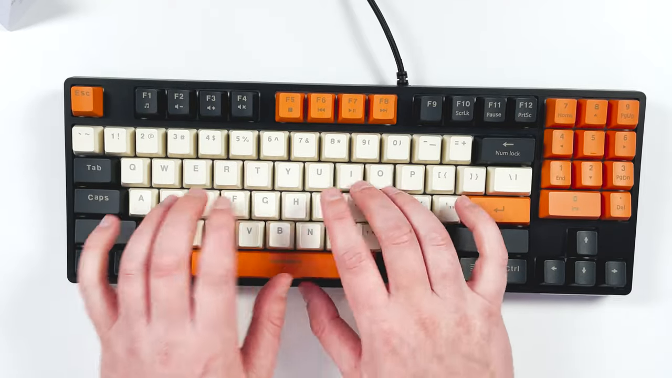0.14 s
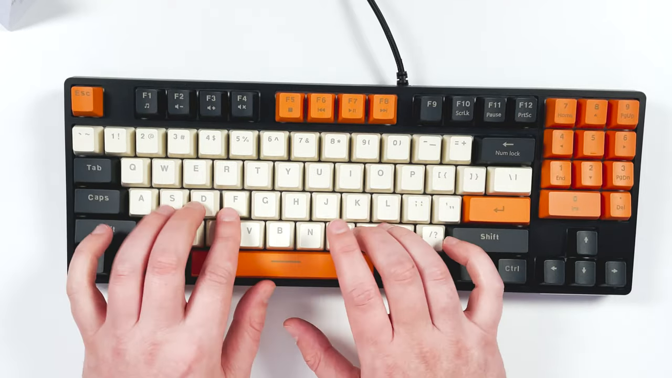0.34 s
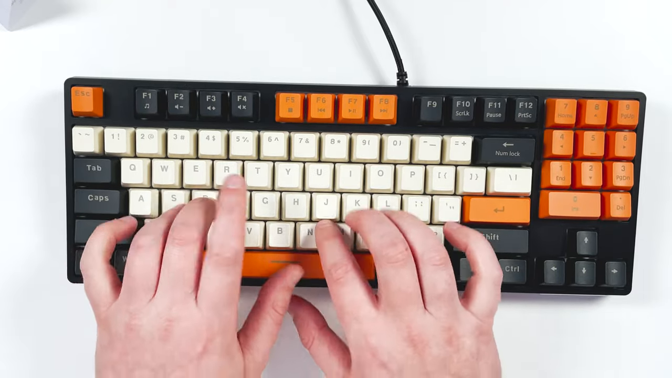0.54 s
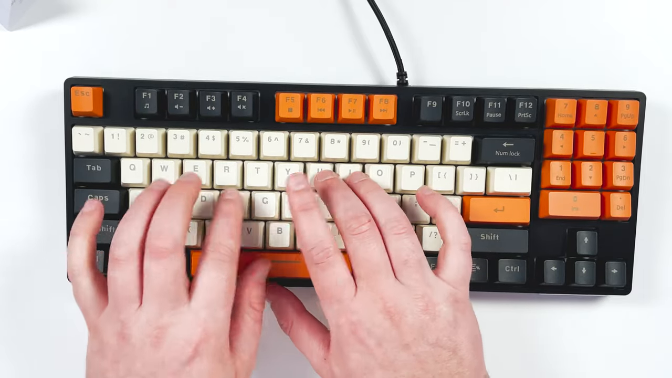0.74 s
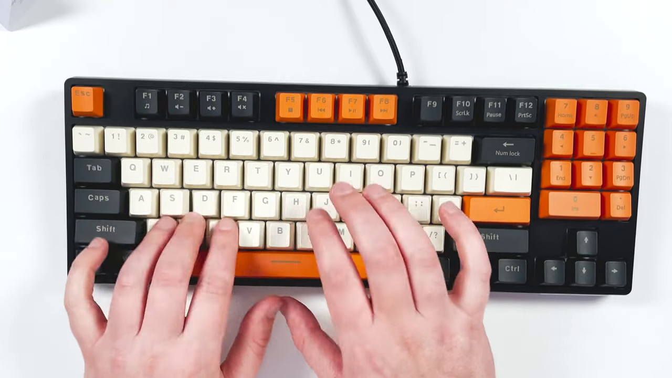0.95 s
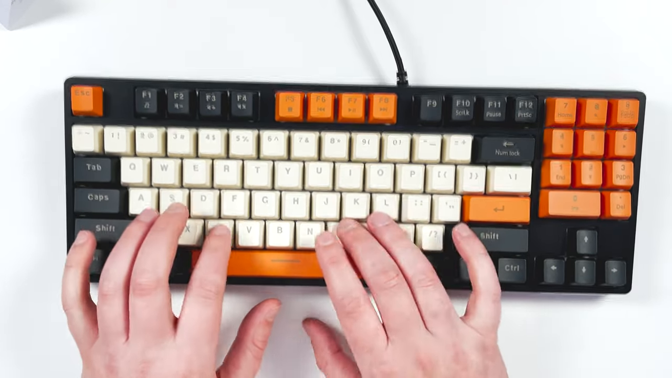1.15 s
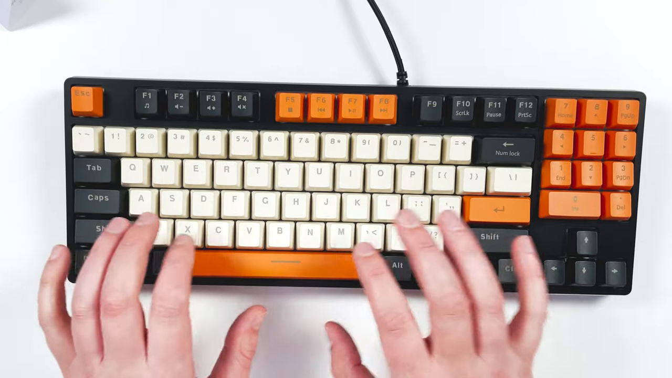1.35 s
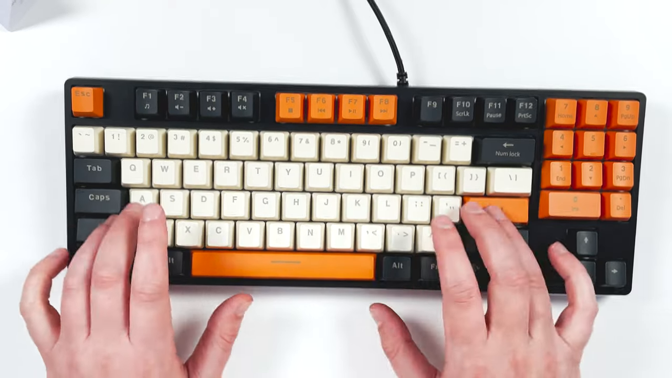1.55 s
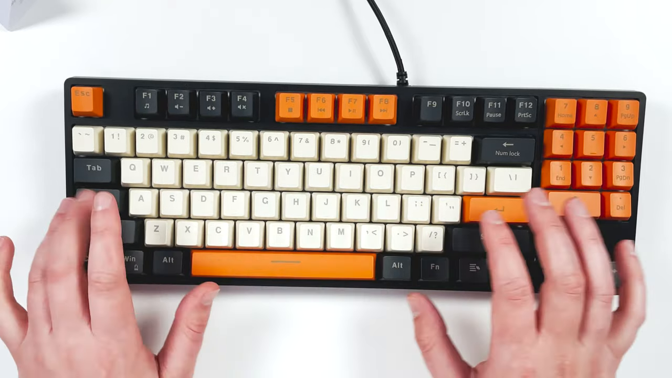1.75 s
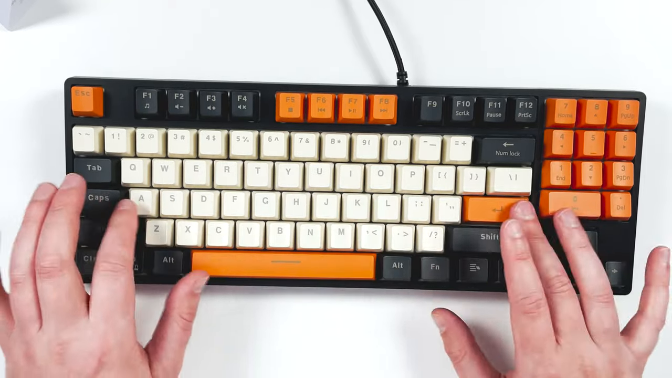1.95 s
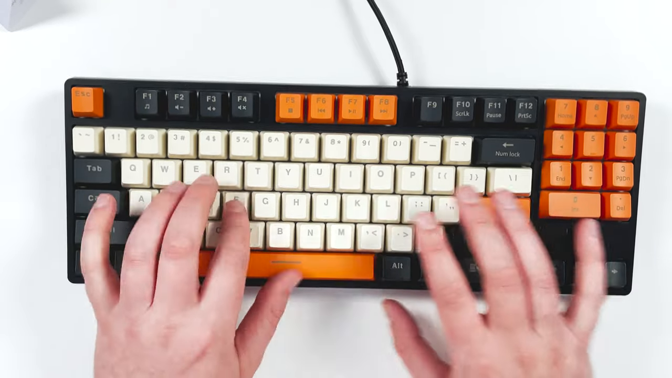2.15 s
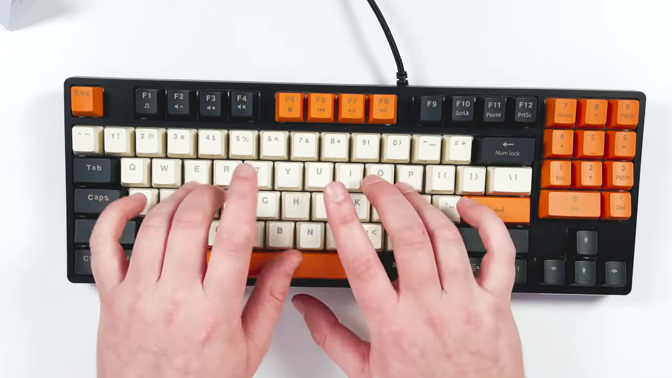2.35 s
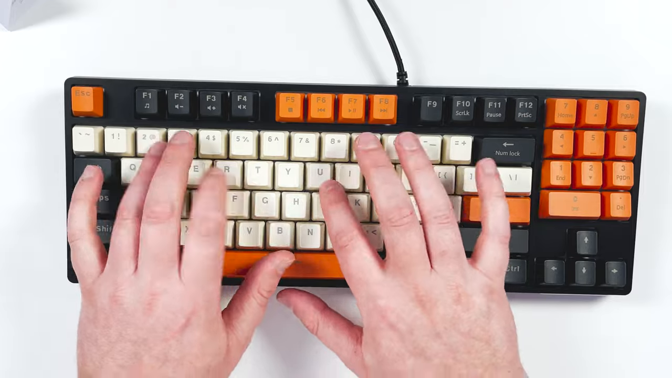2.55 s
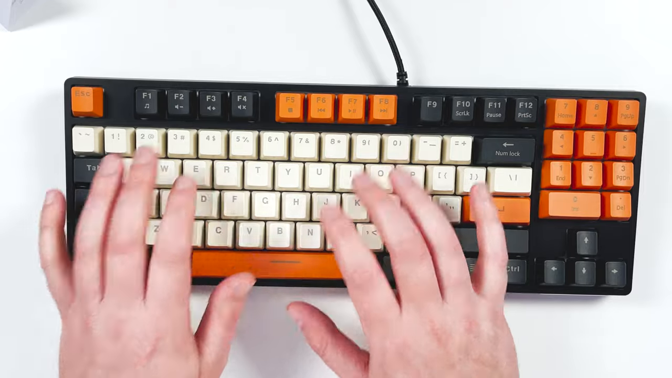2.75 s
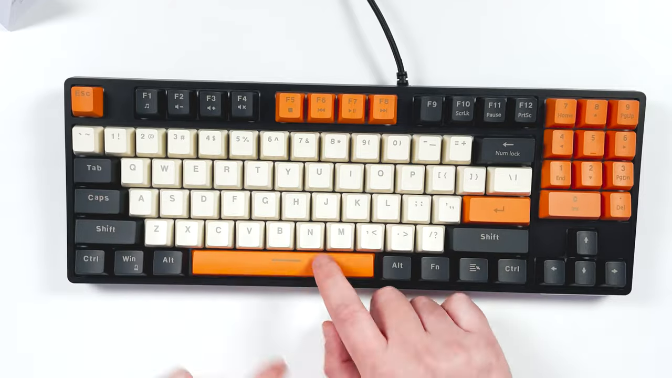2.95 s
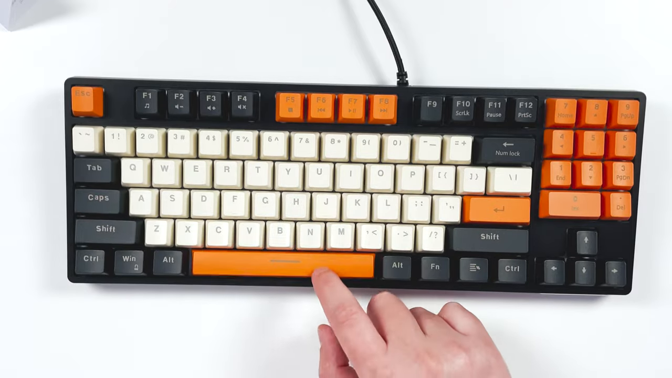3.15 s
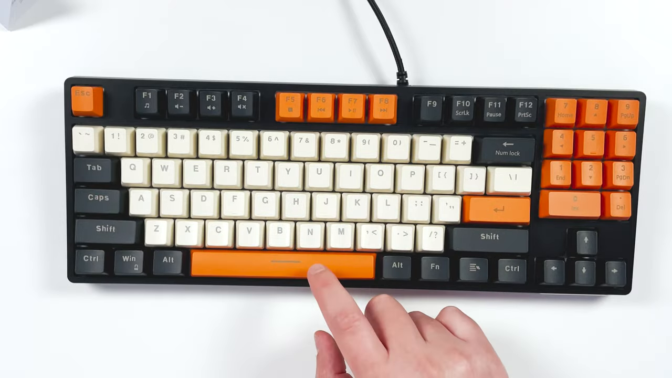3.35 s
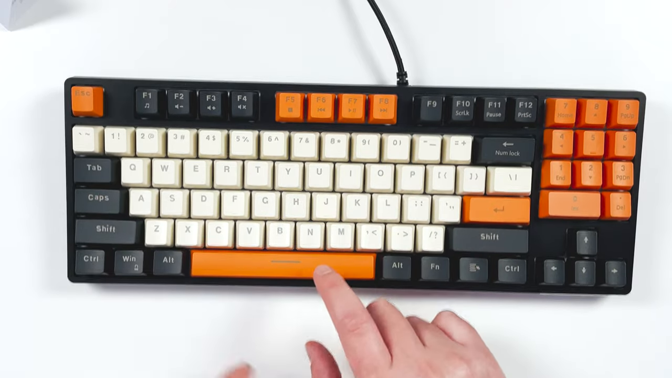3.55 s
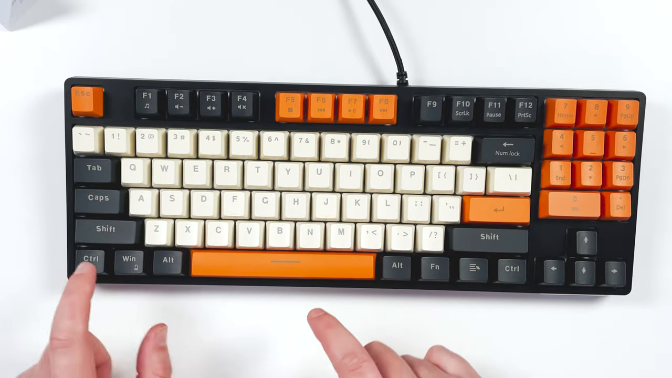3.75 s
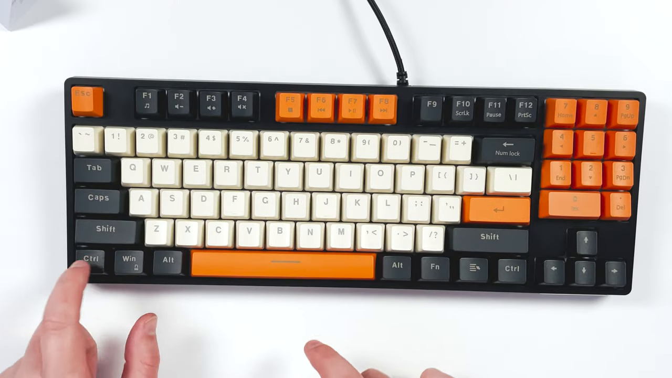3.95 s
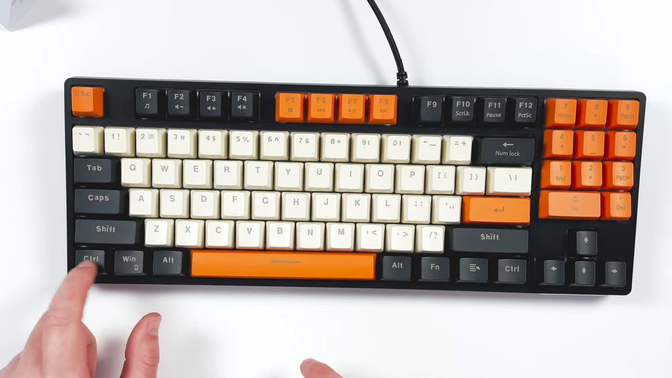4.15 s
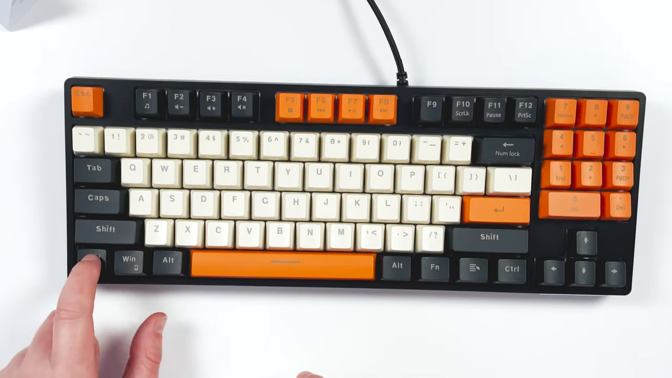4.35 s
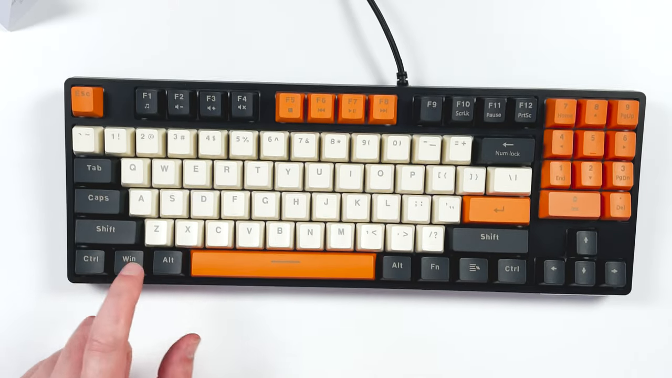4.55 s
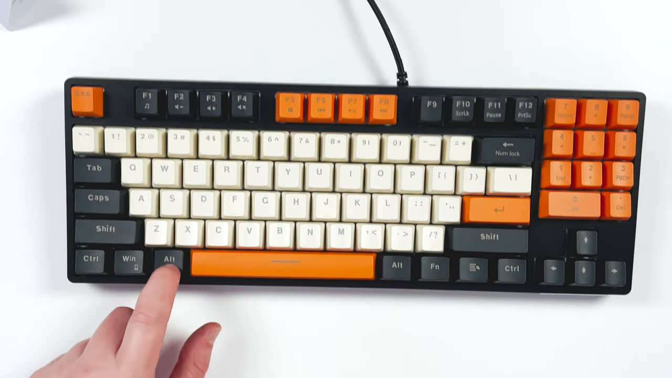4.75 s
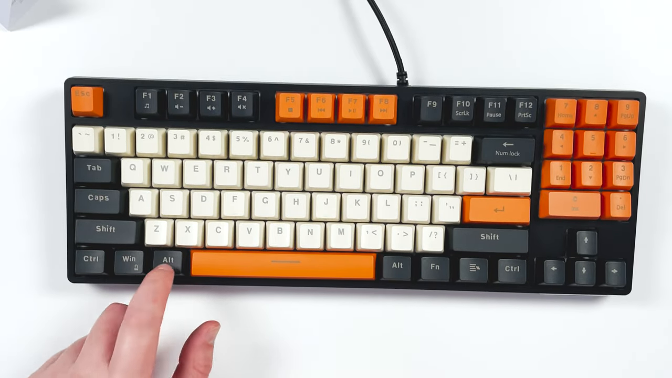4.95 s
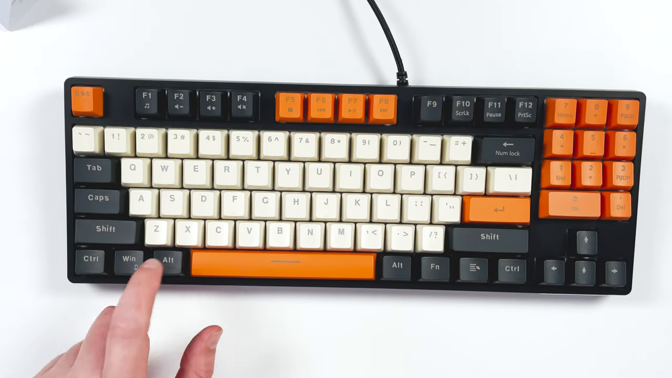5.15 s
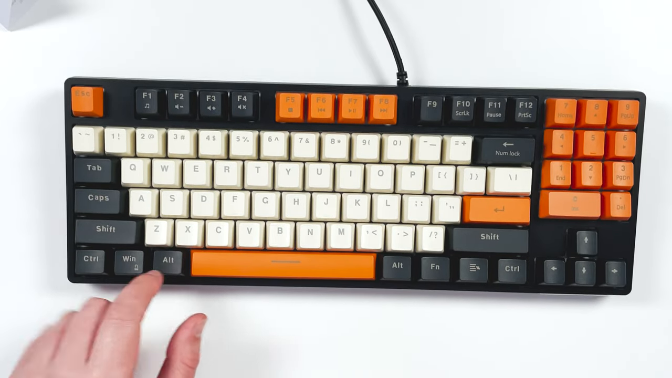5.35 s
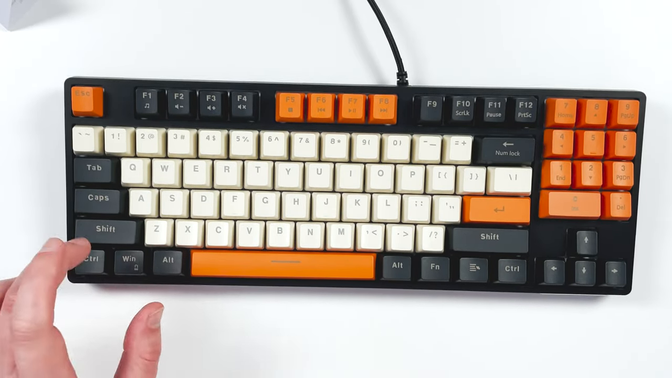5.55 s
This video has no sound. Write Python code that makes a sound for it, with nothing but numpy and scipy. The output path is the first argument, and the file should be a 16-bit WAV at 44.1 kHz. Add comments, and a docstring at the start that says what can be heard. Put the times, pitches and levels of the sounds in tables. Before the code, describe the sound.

Close, dry typing: light plastic ticks and crisp clacks in rapid irregular runs, with soft desk thuds beneath. Around the middle the hands strike heavier wide keys, then letters again. From three seconds single strokes take over: three bright, full space bar hits, then pairs of down-and-up clicks from corner keys, with quiet gaps. The small room answers briefly; background is nearly silent.

```python
"""Mechanical keyboard on a desk in a small quiet room, heard from close above: quick runs over letter keys,
a few wide keys, then single strokes on the space bar and corner keys. Contact bursts excite the modes of cap,
keys and plate to make the clacks; decaying low modes of case and desk make the thuds. Single strokes also scrape
on their way and clack again as the spring returns the key. Softer clacks are longer and hollower.
Band-shaped random reflections add a short room tail over low rumble, thin hiss and a faint drone."""
import sys
import numpy as np
from scipy import signal
from scipy.fft import rfft, irfft
from scipy.io import wavfile
from scipy.ndimage import uniform_filter1d

SR = 44100
rng = np.random.default_rng(int(sys.argv[2]) if len(sys.argv) > 2 else 0)


def generate_wav(sig):
    """Save sig (samples, or channels by samples) to the path in sys.argv[1] as 16-bit PCM at SR."""
    pcm = np.round(np.clip(np.atleast_2d(sig).T, -1, 1) * 32767).astype(np.int16)
    wavfile.write(sys.argv[1], SR, pcm)


N = 250929  # samples in the scene
TAPS = 8192  # samples in one clack
MS_PER_S = 1000

# broad spectrum of a blow on a letter cap: (frequency [Hz], gain [dB])
LETTER_COLOUR = [(100, -21), (250, -18), (450, -9), (700, -6.5), (1050, 1), (1600, -4), (2300, -6),
                 (3200, -6.5), (4500, -6), (5800, -6.5), (7400, -18.5), (9200, -13), (11500, -19),
                 (15500, -29.5)]
# resonances of small keys and plate: (frequency [Hz], width [Hz], nominal level above the colour [dB])
LETTER_RINGS = [(1002, 71, -4.5), (1127, 34, 0), (1234, 27, 2), (1364, 41, 3), (1490, 32, 1),
                (1710, 47, -8.5), (2430, 75, -6), (2830, 79, -3.5), (9200, 210, -12)]


def amp(db):
    """Level to amplitude: 20 dB is a factor of ten."""
    return 10 ** (np.asarray(db) / 20)


def read(points, hz):
    """Logarithmic frequency scale: joins (frequency [Hz], value) points by straight lines on it."""
    f, value = np.transpose(points)
    return np.interp(np.log(hz + 1), np.log(f + 1), value)


def add(mix, s, sound):
    """Superposition: adds a sound to the mix from time s [s]."""
    part = mix[max(0, round(s * SR)):][:len(sound)]
    part += sound[:len(part)]


def causal(db):
    """Minimum phase: the Hilbert transform of the log gain gives a response that rings only after the blow."""
    log_gain = np.log(amp(np.r_[db, db[-2:0:-1]]))
    return np.exp(np.conj(signal.hilbert(log_gain)))[:len(db)]


def hush():
    """Stationary background: noise shaped into low rumble and thin hiss, plus steady sinusoids as a drone."""
    # spectrum of the still room: (frequency [Hz], relative density [dB per Hz])
    hush_colour = [(15, -22), (24, -11), (31, -19), (45, -4.5), (80, -9.5), (140, -6), (180, -12),
                   (290, -15), (400, -17), (800, -31.5), (2000, -31.5), (7500, -31), (16000, -34.5)]
    # faint steady drone: (frequency [Hz], rms level [dB])
    drone_tones = [(122, -76.5), (48, -90)]
    noise_db = -73  # rms level
    gain = amp(read(hush_colour, np.fft.rfftfreq(N, 1 / SR)))
    noise = irfft(rfft(rng.standard_normal(N)) * gain, N)
    t = np.arange(N) / SR
    drone = sum(amp(db) * np.sqrt(2) * np.sin(2 * np.pi * (hz * t + rng.random())) for hz, db in drone_tones)
    return amp(noise_db) * noise / np.std(noise) + drone


def key_body(colour, rings, place_db=8.0):
    """Modal resonance on a broad colour; the striking point on the mode shapes varies each mode's share."""
    hz = np.fft.rfftfreq(TAPS, 1 / SR)
    shares = rng.uniform(-place_db, place_db, len(rings))
    peaks = sum(amp(db + share) / (1 + 2j * (hz - f) / width)
                for (f, width, db), share in zip(rings, shares))
    return causal(read(colour, hz)) * (1 + peaks)


def contact(contact_ms, first_db, first_ms=0.12):
    """Impulsive contact force: a sharp first impact, then a burst of tiny ones as the cap settles (spectrum)."""
    ms = np.arange(TAPS) * MS_PER_S / SR
    settling = np.exp(-(ms / max(contact_ms, .7)) ** 0.75)
    first_impact = amp(first_db) * np.exp(-ms / first_ms)
    force = rfft(rng.choice([-1, 1], TAPS) * (settling + first_impact))
    # such short impacts feed all bands about equally
    band_power = uniform_filter1d(abs(force) ** 2, size=170)
    return force * causal(-10 * np.log10(band_power + 1e-12))


def clack(body, force, db, hollow_db, bright_db, cap_hz, cap_db, cap_q=11, cap_spill=0.099):
    """Source-filter radiation of one blow, upward and outward; db is energy per ms before hollow and bright."""
    hz = np.fft.rfftfreq(TAPS, 1 / SR)
    cap = amp(cap_db) / (1 + 2j * cap_q * (hz / cap_hz - 1))
    # summed over all directions, the notches of the burst fill in
    local_power = uniform_filter1d(abs(force) ** 2, size=12)
    spread = force * causal(-7 * np.log10(local_power + 1e-6))
    # bending waves in the plate carry the treble first and the bass later
    dispersion = np.exp(-2j * np.pi * np.sqrt(hz / 420))
    # the ring of the cap beams upward, so little of it reaches the walls
    upward = force * (1 + cap)
    outward = spread * (1 + cap_spill * cap)
    blows = body * dispersion * np.array([upward, outward])
    # upward energy gathered into one millisecond
    size = np.sqrt(np.sum(irfft(blows[0]) ** 2) * MS_PER_S / SR)
    hollow = read([(600, 0), (950, 1), (1450, 1), (2000, 0)], hz)
    bright = read([(3000, 0), (6000, 1)], hz)
    tone = causal(hollow_db * hollow + bright_db * bright)
    fade = np.cos(np.linspace(0, np.pi / 2, TAPS)) ** 2
    return amp(db) / size * irfft(blows * tone) * fade


def keycap(colour, rings, contact_ms, first_db, cap_db):
    """Nonlinear contact: the softer the blow on this cap, the longer it settles and the hollower it sounds."""
    firm_db = -30  # level of the reference blow
    settling, hollowing = 0.4, 0.62  # dB of settling time, dB of hollow tone, per dB softer

    def blow(db, hollow_db, bright_db, cap_hz):
        """Impact response: one clack of this cap."""
        softer_db = firm_db - db
        force = contact(contact_ms * amp(settling * softer_db), first_db)
        body = key_body(colour, rings)
        return clack(body, force, db, hollow_db + hollowing * softer_db, bright_db, cap_hz, cap_db)
    return blow


def thud(place, db, rise_s=0.0032, detune=0.021):
    """Modal decay of case and desk; the place struck sets each mode's share, the hand shifts its pitch a little."""
    # low modes: (nominal frequency [Hz], t60 [s], then relative level [dB] struck at
    # the letters (place 0), the space bar (1), the corner (2), the wide keys (3))
    desk_modes = [(128, 0.45, -14, -18.5, -15.5, -21), (173.5, 0.37, -10, -12, -6.5, -8.5),
                  (213.1, 0.22, -4, 2, 3, -5), (236.5, 0.36, -4.5, -8, -8.5, -8.5),
                  (310.5, 0.46, -24.5, -23, -16, -12.5), (415, 0.081, -10, 0, -26, -2.5),
                  (477.8, 0.067, -5, 1, -23, -3.5), (555, 0.041, -12, -23, -33, -14.5)]
    t = np.arange(SR // 2) / SR
    shifts = 1 + detune * rng.uniform(-1, 1, len(desk_modes))
    modes = sum(amp(level[place] - 60 * t / t60) * np.sin(2 * np.pi * hz * shift * t)
                for (hz, t60, *level), shift in zip(desk_modes, shifts))
    return amp(db) * modes * (1 - np.exp(-t / rise_s))


def sway(db, rise_s=0.0043):
    """Damped oscillation: a stroke bounces the desk top in one low mode."""
    sway_hz, sway_t60_s = 75.4, .3
    t = np.arange(SR // 2) / SR
    return amp(db - 60 * t / sway_t60_s) * np.sin(2 * np.pi * sway_hz * t) * (1 - np.exp(-t / rise_s))


def light_clicks(count=4, thud_db=-32, graze_hollow_db=-6, graze_bright_db=2):
    """Weak impacts: lone clicks, and grazes of other caps in the fastest run; they barely move the desk."""
    # caps brushed by a finger or springing back, and the wire of a wide key rattling just after it lands: (time
    # [s], level [dB], hollow tone of a firm blow [dB], brightness [dB], cap ring [Hz])
    lone_clicks = [(0.001, -48, -11, -2, 2460), (0.094, -45.5, -5, 8.5, 10000),
                   (0.209, -49.5, -5, -3, 4700), (0.2332, -39.5, -3, 1, 4480),
                   (0.2377, -43, -11, -18, 3490), (0.3955, -42.5, -6, -4, 3550),
                   (0.5344, -41.5, -5.5, 0, 3530), (0.5475, -39, -4.5, -11, 4160),
                   (0.602, -47, -2, -2, 2780), (0.731, -43, -0.5, 3.5, 2780), (0.7473, -40.5, -17, 1, 2750),
                   (0.8587, -39.5, -11, -1, 5790), (0.89, -31, -6, 2, 3020), (0.904, -39, 4, -3, 2240),
                   (0.915, -39.5, -2, 1, 2410), (1.136, -38, -25, -14, 4180),
                   (1.2225, -42.5, -10, -9, 2720), (1.5244, -38.5, -8, 12, 5040),
                   (1.6296, -40, -8, 4, 3360), (1.652, -34, -6, 4, 3360), (1.9146, -34.5, -5.5, -2.5, 5120),
                   (1.9867, -44, -5, 12.5, 5150), (2.288, -36.5, -14, -9, 9840),
                   (2.3152, -35.5, -11, -1, 3250), (2.4937, -37.5, -5.5, -2, 2760),
                   (2.5275, -39.5, -6, -3, 2840), (2.5598, -34.5, -3.5, -3.5, 4460),
                   (2.606, -37, -16.5, -4, 4770), (2.7223, -46, -8, -4, 9260), (2.7331, -40, -1, 3, 3260),
                   (3.1925, -38, -11, 0.5, 4390)]
    flurry_start_s, flurry_end_s = 0.63, 0.88
    graze_db, graze_low_hz, graze_high_hz = -50, 2300, 5460
    blow = keycap(LETTER_COLOUR, LETTER_RINGS, contact_ms=2.8, first_db=1.5, cap_db=4.5)
    grazes = []
    for k, (when, key) in enumerate(rng.random((count, 2))):
        # one graze at a random moment in each equal part of the run
        s = flurry_start_s + (flurry_end_s - flurry_start_s) * (k + when) / count
        cap_hz = graze_low_hz + (graze_high_hz - graze_low_hz) * key
        grazes.append((s, graze_db, graze_hollow_db, graze_bright_db, cap_hz))
    clacks, lows = [], []
    for s, db, hollow_db, bright_db, cap_hz in list(lone_clicks) + grazes:
        clacks.append((s, blow(db, hollow_db, bright_db, cap_hz)))
        lows.append((s, thud(0, db + thud_db)))
    return clacks, lows


def quick_keys(rows, touch, landing, place, sway_db, touch_hollow_db):
    """Successive impacts: a finger touches the cap, then the key lands with a thud; sway_db is re the thud."""
    clacks, lows = [], []
    for s, db, lead_ms, touch_db, hollow_db, bright_db, cap_hz, thud_db in rows:
        touch_s = s - lead_ms / MS_PER_S
        clacks.append((touch_s, touch(touch_db, hollow_db + touch_hollow_db, bright_db, cap_hz)))
        clacks.append((s, landing(db, hollow_db, bright_db, cap_hz)))
        lows.append((s, thud(place, thud_db) + sway(thud_db + sway_db)))
    return clacks, lows


def letter_keys():
    """Two-stage impact of small caps: a touch, then a shorter landing burst in the same colour."""
    # presses: (landing time [s], landing level [dB], touch lead [ms], touch level [dB], hollow tone near 1 kHz
    # of a firm landing [dB], brightness [dB], cap ring [Hz], thud gain [dB])
    presses = [(0.046, -47, 13, -43, -14, 1, 4730, -49.5), (0.0805, -32.5, 8.3, -40, -9.5, -7.5, 5600, -63),
               (0.2545, -31.5, 8.6, -35, -7, 0.5, 3700, -44), (0.3388, -44, 2, -53, -12, 3, 5000, -56),
               (0.3834, -44, 4.3, -49, -8.5, 2.5, 2320, -58), (0.4593, -32, 20, -42, -9, -2, 4600, -55.5),
               (0.5774, -40, 21, -44, -6.5, -1.5, 3000, -49.5),
               (0.6591, -31, 6.2, -39, -7.5, 1, 4770, -53.5), (0.7243, -42, 22, -44, -9, 0, 4200, -53.5),
               (0.7761, -38, 14.4, -37.5, -6, -0.5, 3500, -54),
               (0.9417, -28, 8.6, -36.5, -5, -1.5, 4000, -43),
               (1.0132, -43, 8.4, -44.5, -10.5, 4, 3720, -50.5),
               (1.08, -38, 7.4, -45.5, -8, -2.5, 2030, -70), (2.4418, -34, 4, -76, -2.5, 3.5, 8720, -53),
               (2.6413, -37, 8.3, -34.5, -2, -5, 2660, -56), (2.7491, -29, 7.8, -31, -3.5, -7, 2320, -61)]
    touch = keycap(LETTER_COLOUR, LETTER_RINGS, contact_ms=2.1, first_db=-5, cap_db=7)
    landing = keycap(LETTER_COLOUR, LETTER_RINGS, contact_ms=1.3, first_db=-7.5, cap_db=6)
    return quick_keys(presses, touch, landing, place=0, sway_db=-8.0, touch_hollow_db=1.5)


def slide(body, db, length_s):
    """Friction noise: the stem scrapes in its housing, louder and louder, just before the clack."""
    n = int(length_s * SR)
    friction = rng.standard_normal(n) * np.linspace(.2, 1, n)
    scrape = irfft(body * rfft(friction, TAPS))
    return amp(db) * scrape / np.std(scrape[:n])


def single_strokes(rows, colour, rings, place, contact_ms, first_db, cap_db, sway_db, slide_s,
                   up_bright_db, up_thud_db, up_slide_db):
    """Spring return: slide, clack, thud and sway going down; slide, clack and thud coming up."""
    blow = keycap(colour, rings, contact_ms, first_db, cap_db)
    clacks, lows = [], []
    for down_s, down_db, held_ms, up_db, hollow_db, down_bright_db, cap_hz, thud_db, slide_db in rows:
        up_s = down_s + held_ms / MS_PER_S
        down = (down_s, down_db, down_bright_db, slide_db)
        up = (up_s, up_db, up_bright_db, up_db + up_slide_db)
        for s, db, bright_db, scrape_db in (down, up):
            scrape = slide(key_body(colour, rings), scrape_db, slide_s)
            clacks.append((s - slide_s, (scrape, scrape)))
            clacks.append((s, blow(db, hollow_db, bright_db, cap_hz)))
        lows.append((down_s, thud(place, thud_db) + sway(sway_db)))
        lows.append((up_s, thud(place, up_db + up_thud_db)))
    return clacks, lows


def space_bar():
    """Modal excitation of a long bar: firm single strokes, down and up again."""
    # strokes: (landing time [s], landing level [dB], held [ms], release level [dB], hollow tone of a firm
    # blow [dB], landing brightness [dB], cap ring [Hz], thud gain [dB], stem slide level going down [dB])
    strokes = [(1.1422, -26.5, 100, -44.5, 2, 0.5, 4140, -46, -48),
               (2.1654, -21, 128, -38, -0.5, -4, 6430, -43.5, -68),
               (3.0051, -18.5, 103.4, -27, -0.5, 1, 3060, -34.5, -44.5),
               (3.2094, -25.5, 80.7, -24, 0, -9.5, 3170, -41, -59),
               (3.4338, -20.5, 95.8, -27.5, -2, -0.5, 3140, -37.5, -45.5)]
    # broad spectrum of the clack: (frequency [Hz], gain [dB])
    bar_colour = [(100, -14), (250, -13.5), (450, -5.5), (700, -4.5), (1050, 0), (1600, 3.5), (2300, -2),
                  (3200, -5.5), (4500, -5), (5800, -4.5), (7400, -8.5), (9200, -7.5), (12800, -12),
                  (15500, -23)]
    # resonances: (frequency [Hz], width [Hz], nominal level above the colour [dB])
    bar_rings = [(1195, 27, 0), (1530, 20, -3.5), (1944, 20, -12), (2220, 79, -12), (3227, 280, 1.5),
                 (4250, 140, -4.5), (5170, 280, -3), (9200, 160, 1)]
    return single_strokes(strokes, bar_colour, bar_rings, place=1, contact_ms=2.43, first_db=-8.5, cap_db=8,
                          sway_db=-46, slide_s=0.013, up_bright_db=0.5, up_thud_db=-16, up_slide_db=-31)


def wide_keys():
    """Two-stage impact of wide caps at both ends of the rows: their own colour on the letter resonances."""
    # presses: (landing time [s], landing level [dB], touch lead [ms], touch level [dB], hollow tone near 1 kHz
    # of a firm landing [dB], brightness [dB], cap ring [Hz], thud gain [dB])
    presses = [(1.5403, -19.5, 9.4, -24, -1.5, 5.5, 4320, -40),
               (1.6454, -28, 4.3, -36, -10.5, -5.5, 3670, -44), (1.8014, -27.5, 8.2, -48, 0, 5, 5050, -40),
               (1.8868, -26, 5.9, -36, -11.5, 1.5, 3100, -40),
               (1.9635, -22, 5.7, -43, -7.5, 3.5, 5800, -43.5), (2.1174, -36, 12, -39, -13, 1, 3370, -61)]
    # broad spectrum of the clack: (frequency [Hz], gain [dB])
    wide_colour = [(100, -15.5), (250, -5), (350, -4.5), (480, -2.5), (700, -2.5), (1050, 6), (1600, -1.5),
                   (2300, -6.5), (3200, -4), (4500, -6), (6000, -8.5), (7400, -14.5), (9500, -17.5),
                   (11500, -17.5), (15500, -26)]
    touch = keycap(wide_colour, LETTER_RINGS, contact_ms=2.8, first_db=-7.5, cap_db=1.5)
    landing = keycap(wide_colour, LETTER_RINGS, contact_ms=2.5, first_db=-6, cap_db=6)
    return quick_keys(presses, touch, landing, place=3, sway_db=-15, touch_hollow_db=-3.0)


def corner_keys():
    """Modal excitation at the corner of the case: single strokes on modifier keys, down and up again."""
    # strokes: (landing time [s], landing level [dB], held [ms], release level [dB], hollow tone of a firm
    # blow [dB], landing brightness [dB], cap ring [Hz], thud gain [dB], stem slide level going down [dB])
    strokes = [(3.8888, -26, 92.2, -35, -2, 2.5, 4060, -47.5, -52),
               (4.1078, -27.5, 86.5, -32, -1, 1, 5280, -42.5, -53),
               (4.3285, -23, 121.9, -39, -3, 0.5, 4920, -40, -45.5),
               (4.7782, -22, 104, -31.5, -8.5, 3, 2940, -34.5, -44.5),
               (5.0262, -29, 81.9, -31.5, -4.5, 3, 3060, -39, -53),
               (5.2503, -23.5, 134.9, -37, -12, 2, 2860, -35, -45.5)]
    # broad spectrum of the clack: (frequency [Hz], gain [dB])
    corner_colour = [(100, -17), (250, -6), (450, -8), (700, -7.5), (1050, -0.5), (1600, -4.5),
                     (2300, -11.5), (3200, -11), (4500, -10.5), (5800, -13), (7400, -19.5), (9200, -11),
                     (11500, -29), (15500, -29.5)]
    # resonances: (frequency [Hz], width [Hz], nominal level above the colour [dB])
    corner_rings = [(1003, 90, 3), (1092, 63, -10.5), (1213, 35, -0.5), (1750, 120, -2), (1850, 47, -15),
                    (3020, 160, -22), (4500, 104, -18.5), (8470, 280, -10)]
    return single_strokes(strokes, corner_colour, corner_rings, place=2, contact_ms=2.38, first_db=2.5,
                          cap_db=4.0, sway_db=-54.5, slide_s=0.0041,
                          up_bright_db=-1.5, up_thud_db=-24, up_slide_db=-23)


def room(x, first_s=0.0023, build_s=0.0011):
    """Diffuse reverberation: dense reflections of random sign, each band dying at its own speed."""
    # reverberation time: (frequency [Hz], t60 [s])
    room_t60 = [(150, 0.45), (400, 0.23), (1000, 0.21), (2800, 0.21), (6000, 0.22), (10000, 0.16),
                (15000, .14)]
    # tail energy before the gradual onset: (frequency [Hz], level re the sound sent in [dB])
    room_level = [(150, 8), (500, -4), (1100, -1.5), (2500, 2), (5000, -6), (9000, -7.5), (15000, -5)]
    step = 12  # samples: one reflection in each
    taps = np.zeros(SR // 2)
    at = np.arange(0, SR // 2 - step, step)
    signs = rng.choice([-1, 1], len(at))
    taps[at + rng.integers(0, step, len(at))] = signs * np.sqrt(step / SR)
    hz, t, z = signal.stft(taps, SR, nperseg=256)
    t60 = read(room_t60, hz)[:, None]
    decay = amp(read(room_level, hz)[:, None] - 60 * t / t60)
    z *= decay * np.sqrt(2 * np.log(1000) / t60)  # energy independent of t60
    tail = signal.istft(z, SR, nperseg=256)[1]
    since_first_s = np.maximum(np.arange(len(tail)) / SR - first_s, 0)
    tail *= 1 - np.exp(-since_first_s / build_s)
    return signal.fftconvolve(x, tail)[:N]


def scene(count=5, low_room_db=-14):
    """Direct and reverberant fields: clacks take turns over a few spots, each with its own reflections."""
    parts = [letter_keys(), wide_keys(), light_clicks(), space_bar(), corner_keys()]
    clacks, lows = (sum(layer, []) for layer in zip(*parts))
    near, spots, low = np.zeros(N), np.zeros((count, N)), np.zeros(N)
    for k, (s, (upward, outward)) in enumerate(clacks):
        add(near, s, upward)
        add(spots[k % count], s, outward)
    for s, knock in lows:
        add(low, s, knock)
    reflections = sum(room(spot) for spot in spots) + amp(low_room_db) * room(low)
    return (near + low + reflections + hush())[None]


def record(dry):
    """Band limitation: a linear-phase low-pass filter removes the highest treble."""
    edge_hz = 16100
    low_pass = signal.firwin(511, edge_hz, window=("kaiser", 9), fs=SR)
    return signal.oaconvolve(dry, low_pass[None], "same")


dry = scene()
out = record(dry)
generate_wav(out)
```